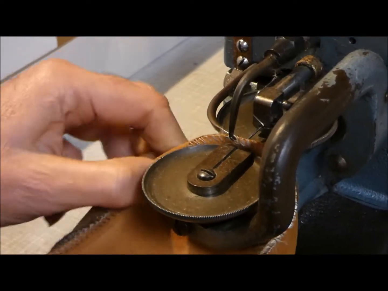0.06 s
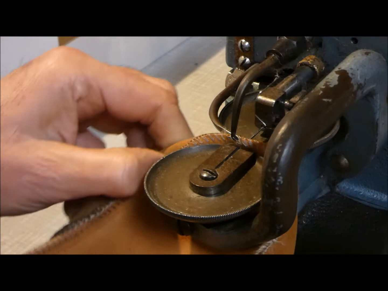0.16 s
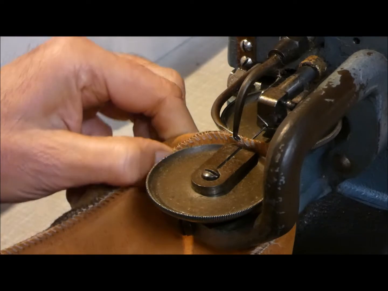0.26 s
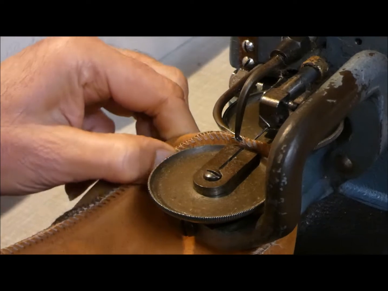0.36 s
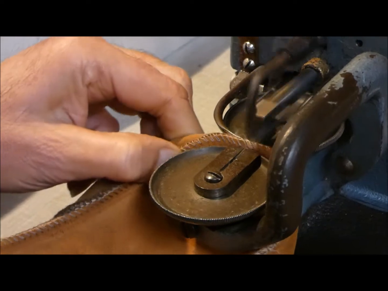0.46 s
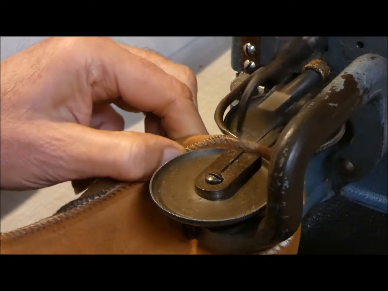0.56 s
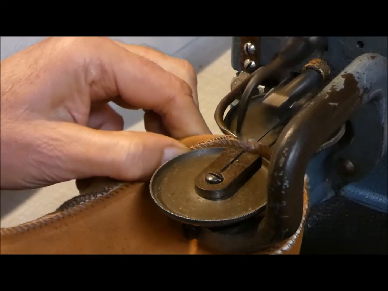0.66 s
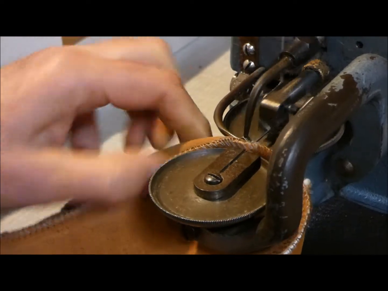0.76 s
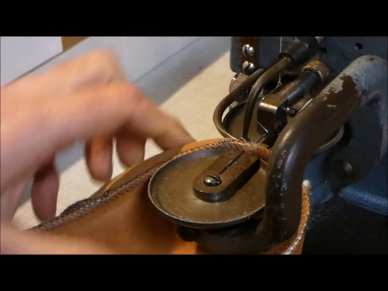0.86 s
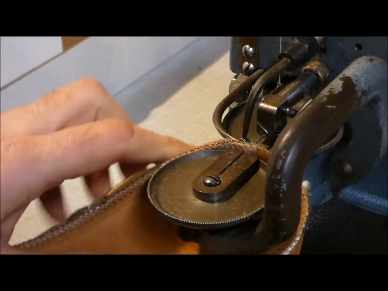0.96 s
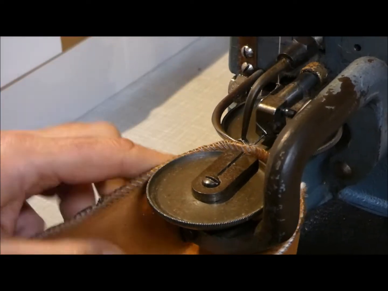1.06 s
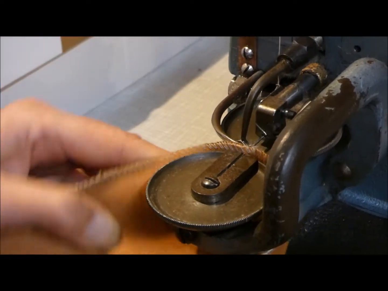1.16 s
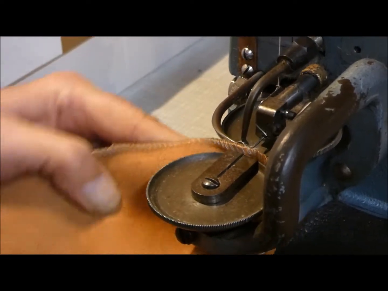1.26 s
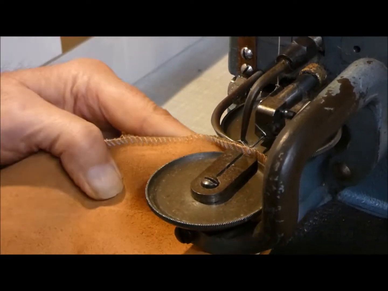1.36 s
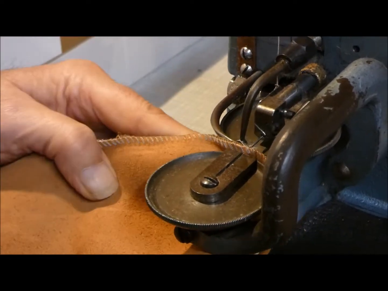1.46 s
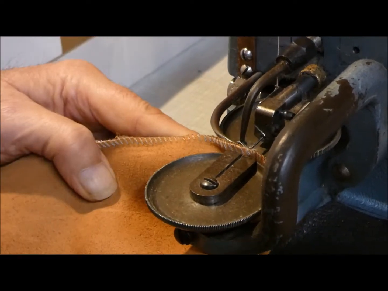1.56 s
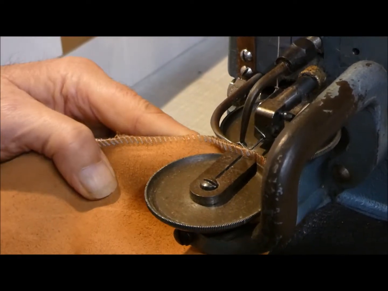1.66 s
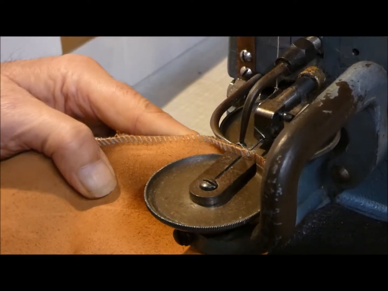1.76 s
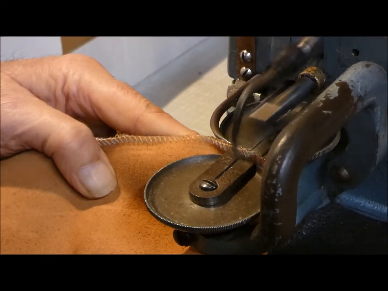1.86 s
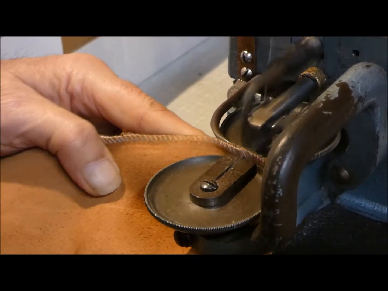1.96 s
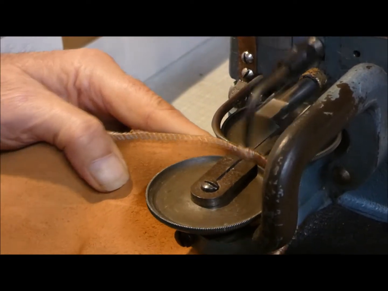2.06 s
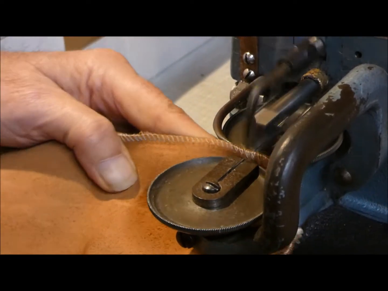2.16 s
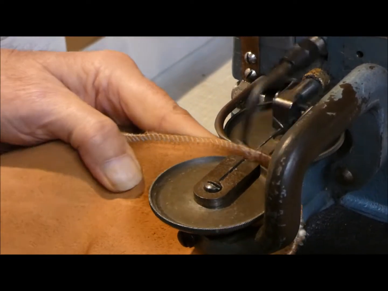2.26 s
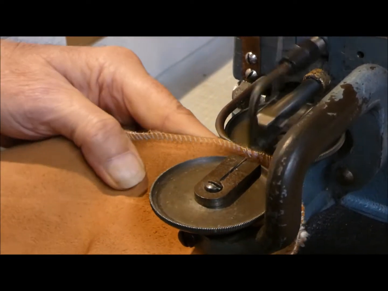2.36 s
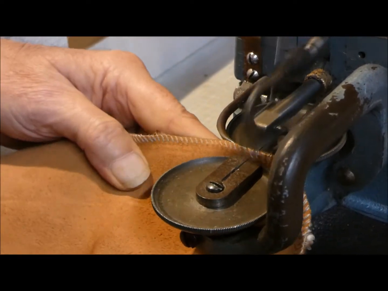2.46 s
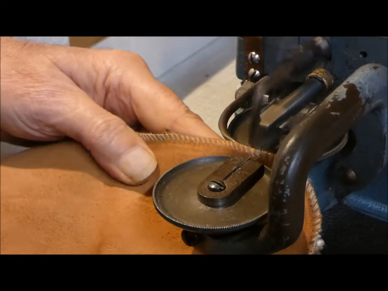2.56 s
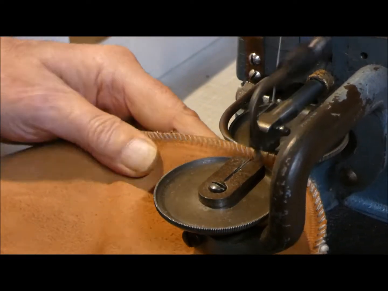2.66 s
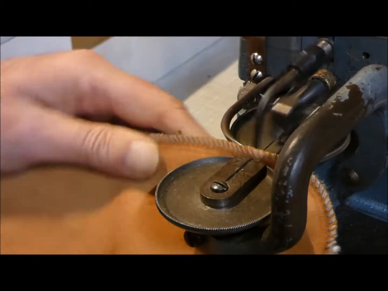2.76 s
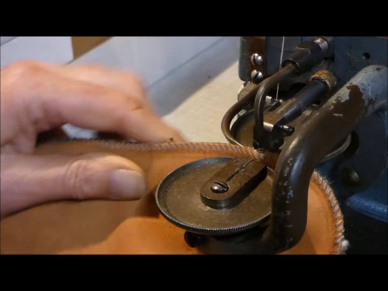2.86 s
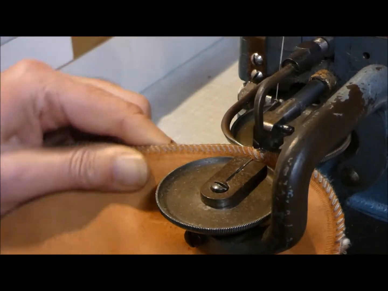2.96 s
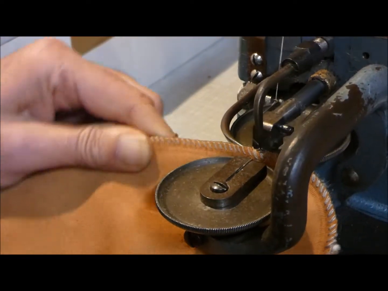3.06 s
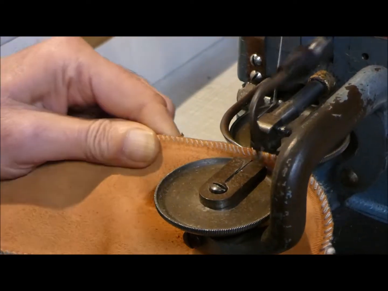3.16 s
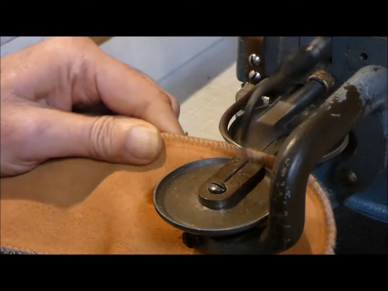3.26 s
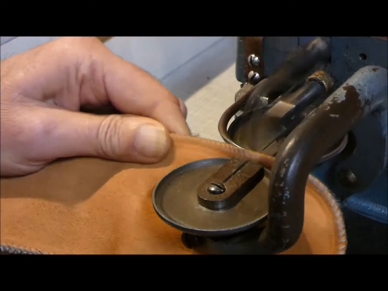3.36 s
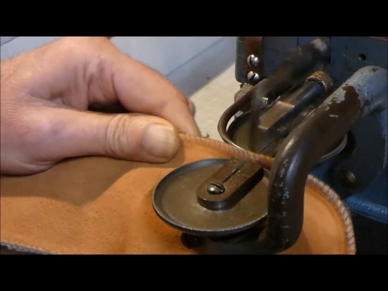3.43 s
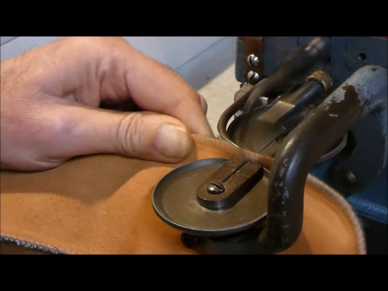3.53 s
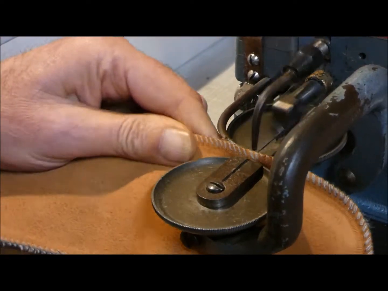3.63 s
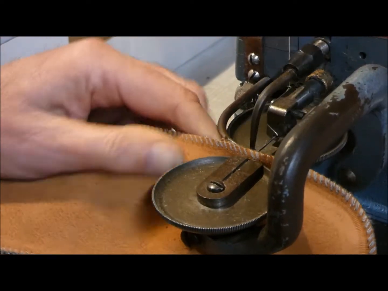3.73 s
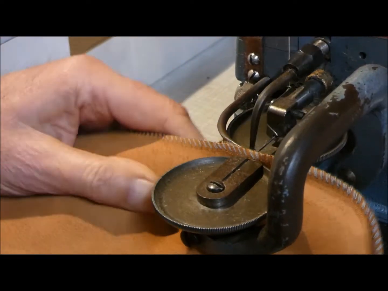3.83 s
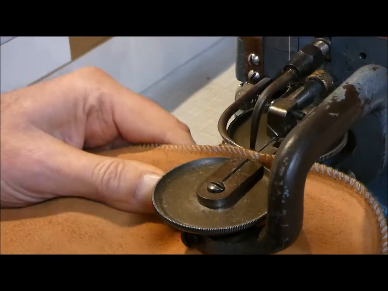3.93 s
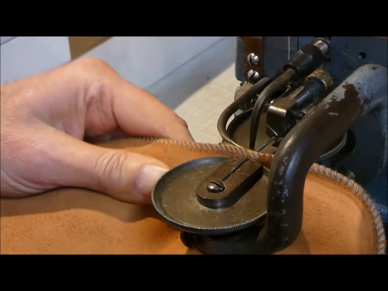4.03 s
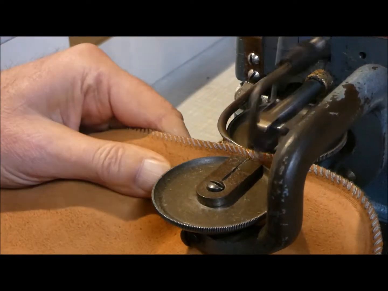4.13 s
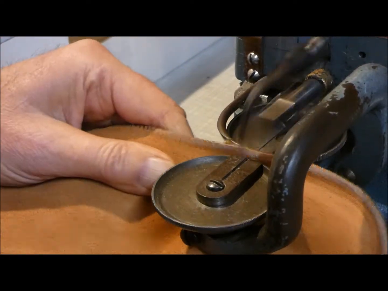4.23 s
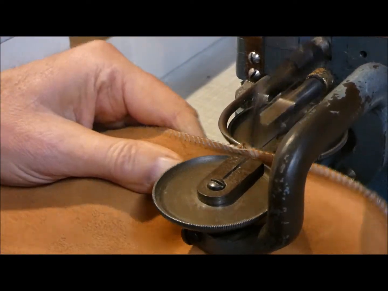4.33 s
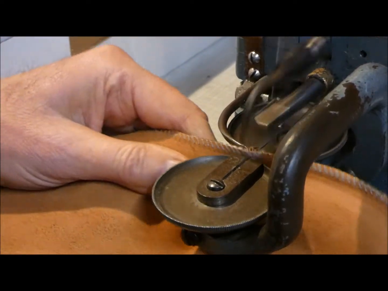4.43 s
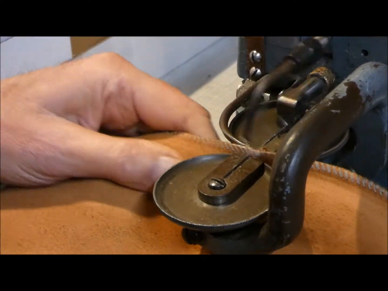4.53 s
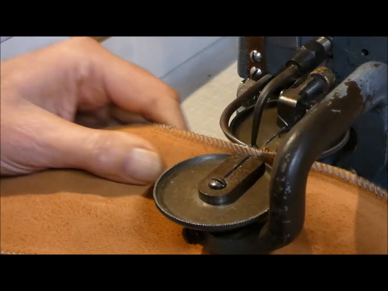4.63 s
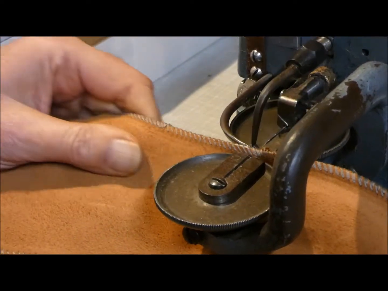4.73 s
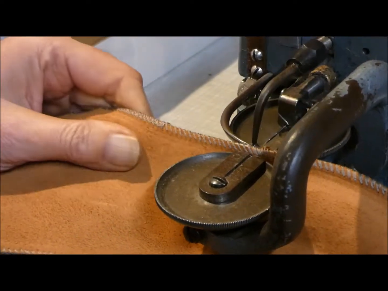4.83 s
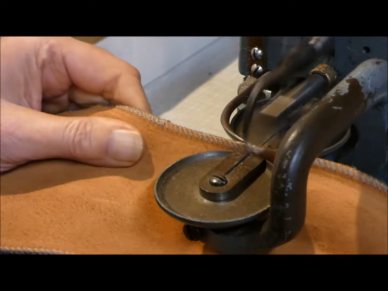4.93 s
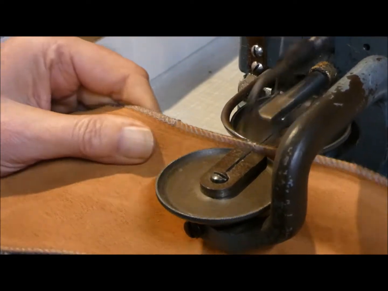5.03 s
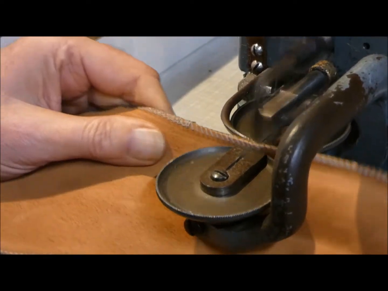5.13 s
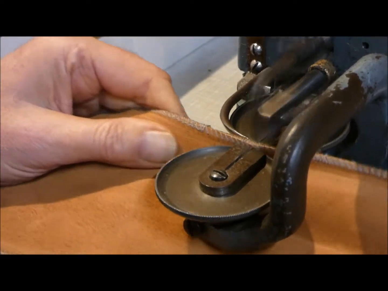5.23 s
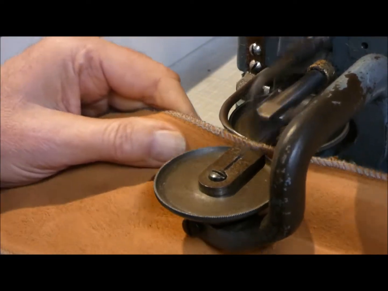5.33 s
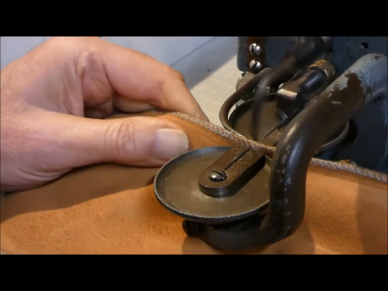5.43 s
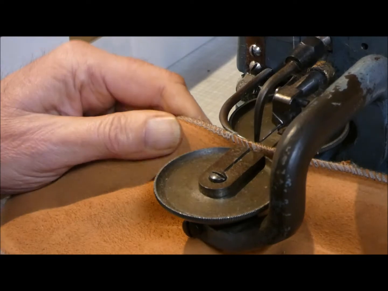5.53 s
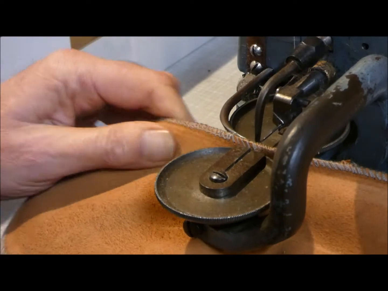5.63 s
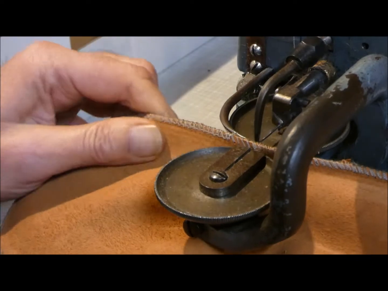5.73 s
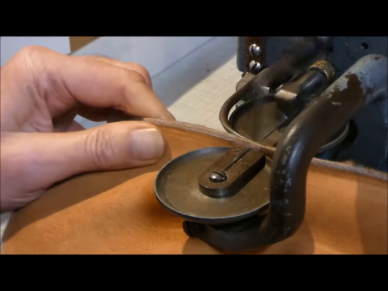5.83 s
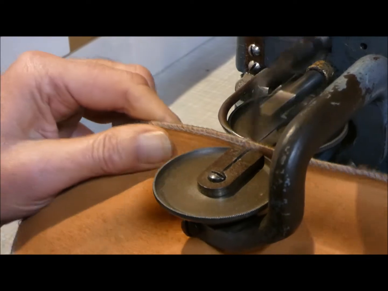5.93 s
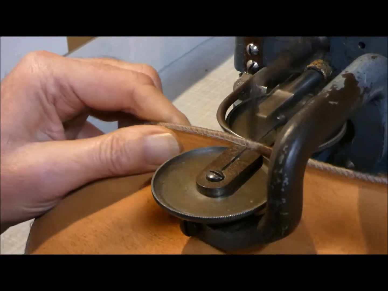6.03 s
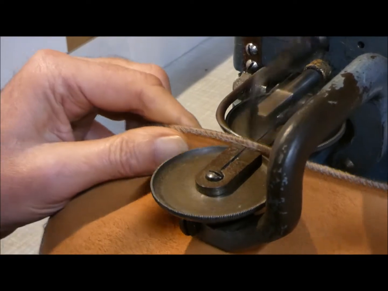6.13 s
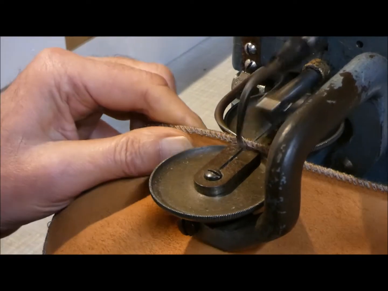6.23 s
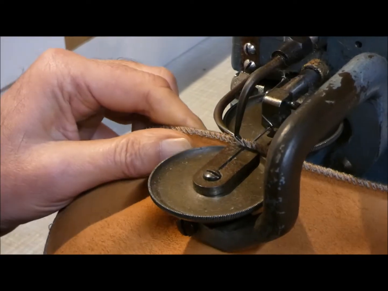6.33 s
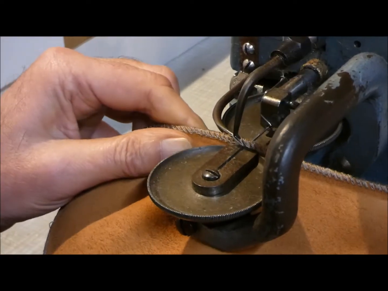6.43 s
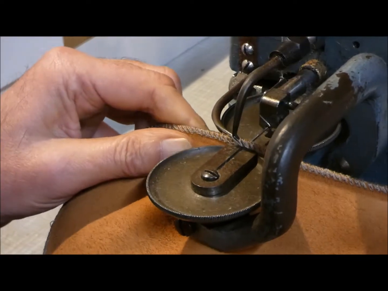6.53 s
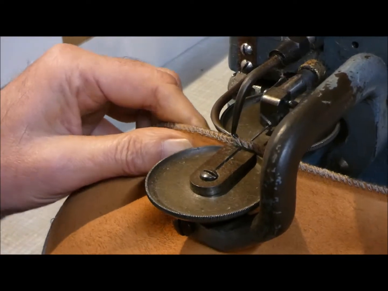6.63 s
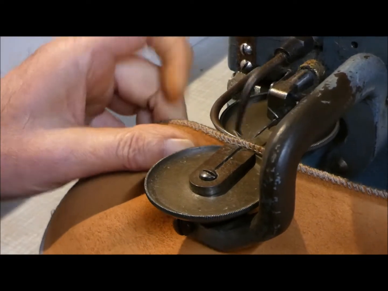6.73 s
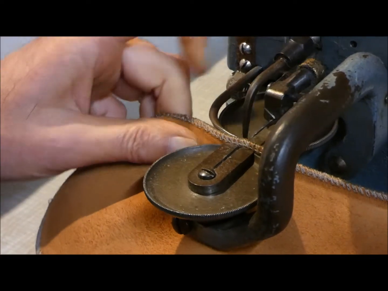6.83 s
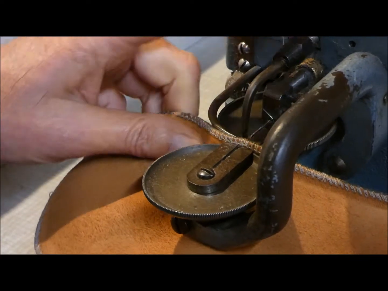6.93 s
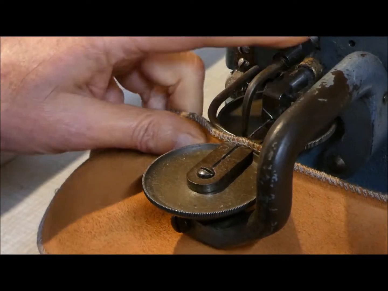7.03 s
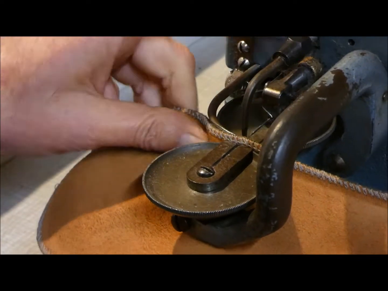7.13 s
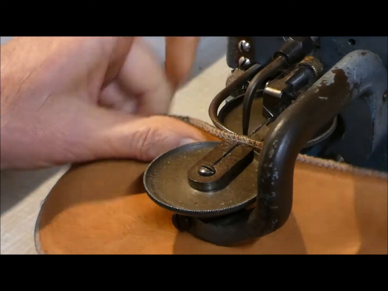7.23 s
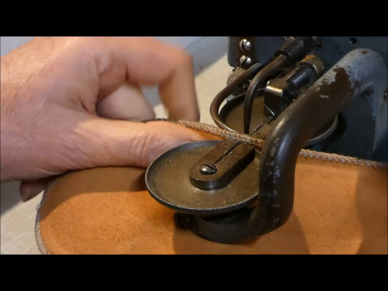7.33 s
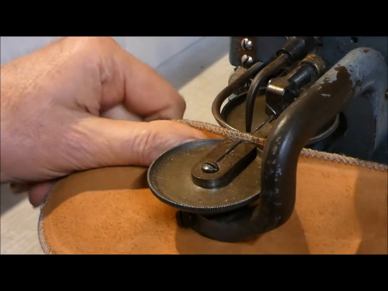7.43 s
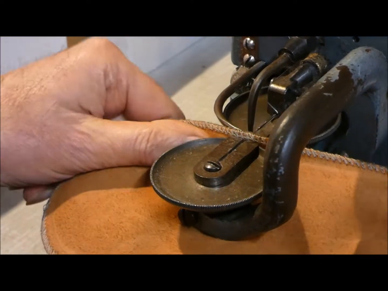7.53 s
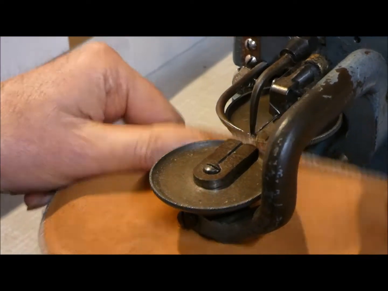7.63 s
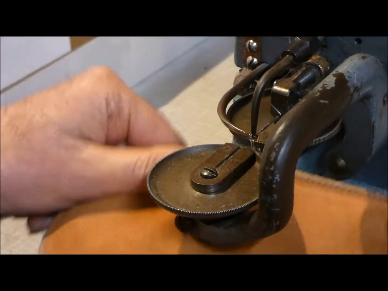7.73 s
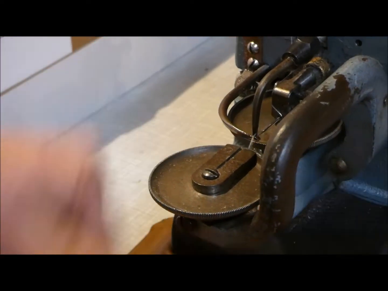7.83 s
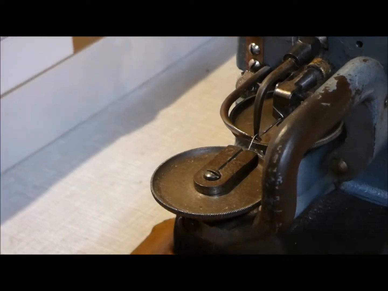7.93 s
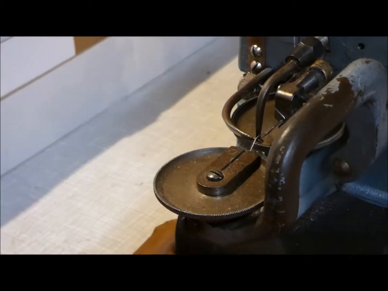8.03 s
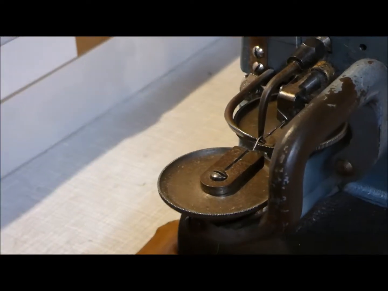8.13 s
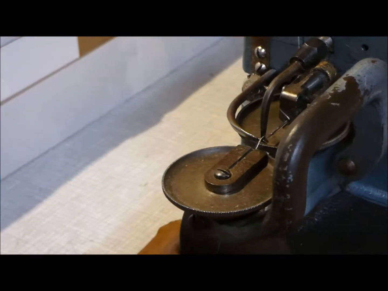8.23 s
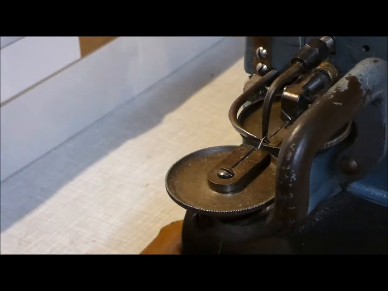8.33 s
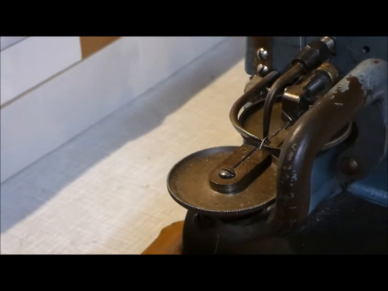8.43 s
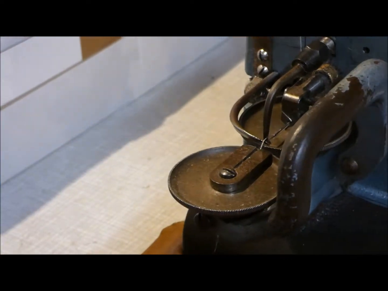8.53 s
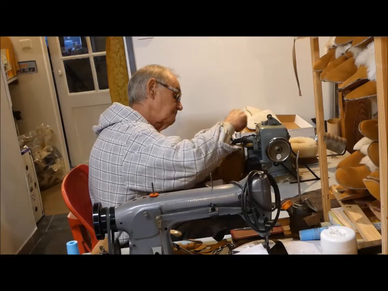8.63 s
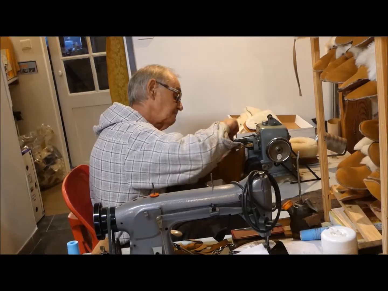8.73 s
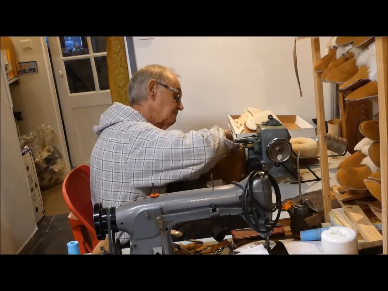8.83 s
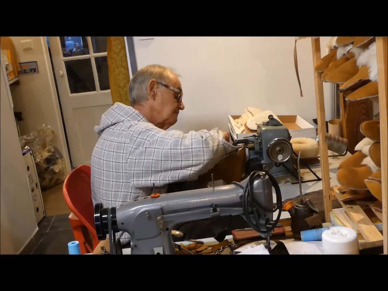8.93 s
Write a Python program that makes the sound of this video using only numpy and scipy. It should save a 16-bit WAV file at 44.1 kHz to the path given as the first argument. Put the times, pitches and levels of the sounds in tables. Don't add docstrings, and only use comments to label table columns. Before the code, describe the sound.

Brief bursts of a motor-driven leather sewing machine hum and rattle, stop abruptly, then two sharp metal knocks, a drag and a chair scrape.

```python
import sys
import numpy as np
from scipy import signal
from scipy.fft import rfft, irfft, next_fast_len
from scipy.io import wavfile
from scipy.ndimage import uniform_filter1d

SR = 44100
rng = np.random.default_rng(int(sys.argv[2]) if len(sys.argv) > 2 else 0)


def inscribe(sig):
    pcm = np.round(np.clip(np.atleast_2d(sig).T, -1, 1) * 32767)
    wavfile.write(sys.argv[1], SR, pcm.astype(np.int16))


def boost(x):
    u = np.asarray(x, float) / 20
    return 10 ** u


N = 396002
TIME = np.arange(N) / SR
SCENE_CHANGE_S = 8.629

# (start [s], held [s], aimed speed [turns/s], braking [turns/s2], angle to first needle pass [turns])
PRESSES = [
    (.4323, .12, 41.0, 60.0, .005),
    (1.8327, .174, 38.33, 56.16, .536),
    (2.3903, .139, 42.85, 56.89, .446),
    (3.1816, .333, 40.21, 154.9, .311),
    (4.1405, .288, 39.03, 134.6, .584),
    (4.9025, .417, 40.88, 155.7, .68),
    (5.7902, .337, 44.8, 179.2, .728),
]
# (time [s], level [dB])
SWITCH_CLICKS = [
    (.012, -37.5),
    (0.4323, -27.5),
    (1.8327, -50),
    (2.3903, -30.5),
    (3.1816, -25.5),
    (3.809, -33),
    (4.1405, -22),
    (4.9025, -26.5),
    (5.7902, -29),
]
# (time [s], level [dB])
THREAD_SNAPS = [
    (3.811, -41),
    (3.825, -39),
]
# (frequency [Hz], width [Hz], level [dB])
TABLE_MODES = [(75, 8.6, -43), (129, 31, -6), (195.4, 27.6, 3.5), (283, 35.5, 5), (371, 58, 3),
               (473, 26, -9)]
# (frequency [Hz], width [Hz], level [dB])
FRAME_MODES = [(384, 88, -3), (565.5, 35.4, 1.5), (637.4, 42.4, 0.5), (757, 123, -4), (940, 40, -2),
               (1106, 84, -2.5), (1331, 61, -10), (1459, 33, -7), (1800, 145, -14), (2210, 480, -19)]
# (frequency [Hz], width [Hz], level [dB])
LINK_MODES = [(2650, 430, -1), (3222, 59, 6), (4304, 55, 4.5), (5320, 52, 4), (6100, 290, -11),
              (7340, 200, -7)]
# (frequency [Hz], width [Hz], level [dB])
NEEDLE_MODES = [(9600, 1300, -17), (13000, 1500, -16), (10300, 500, 5), (11630, 460, 7), (10930, 400, 8),
                (12000, 120, -6)]
# (frequency [Hz], density [dB per Hz])
LOOPER_HISS = [(880, -44), (1500, 1.5), (2780, -4.5), (3210, -10), (3480, -5.5), (4310, -4.5), (5400, -8),
               (8210, -12.5), (11200, -14), (12100, -31), (15500, -47)]
# (multiple of shaft speed [-], level [dB])
IMBALANCE = [(2, -51), (3, -61), (4, -34), (5, -37), (6, -59), (8, -46)]
# (multiple of whine [-], swell [dB])
MODE_CROSSINGS = [(2.0, 8), (1.0, 8.5), (.68, 5.5)]
# (time [s], level [dB], pitch of the answering board [Hz])
CRANK_THUMPS = [(0.481, -10.5, 371), (0.556, -15, 361), (0.699, -32, 372), (1.891, -15, 289),
                (1.973, -8.5, 369), (2.123, -28, 357), (2.263, -35.5, 408), (2.401, -18.5, 386),
                (2.436, -13, 376), (2.52, -9.5, 371), (2.622, -25, 295), (2.662, -29.5, 346),
                (2.703, -35, 275), (3.182, -28, 312), (3.213, -15, 371), (3.247, -11.5, 292),
                (3.321, -16, 306), (3.357, -12, 288), (3.464, -14.5, 363.6), (3.535, -17.5, 282),
                (3.649, -26, 371), (4.16, -16, 367), (4.221, -14, 296.5), (4.262, -12, 375),
                (4.414, -11.5, 367.4), (4.484, -21.5, 409), (4.541, -23, 263), (4.953, -13.5, 285),
                (5.004, -11, 377), (5.043, -9.5, 367.5), (5.117, -19, 362), (5.201, -15.5, 301.5),
                (5.279, -17.5, 359), (5.345, -19.5, 266), (5.802, -27, 393), (5.822, -16.5, 377),
                (5.874, -20, 362), (5.917, -14, 300), (5.958, -13, 351), (6.03, -16, 352),
                (6.12, -17.5, 262), (6.22, -21, 352)]
# (time [s], level [dB])
LINKAGE_JOLTS = [(0.483, -10.5), (0.513, -18), (0.533, -13), (0.687, -17), (0.717, -32), (1.841, -35),
                 (1.862, -35), (1.88, -24), (1.899, -15), (1.946, -12), (1.98, -13), (2.098, -25),
                 (2.415, -17), (2.477, -15), (2.637, -14), (2.726, -18), (3.221, -23), (3.262, -18),
                 (3.524, -9), (4.171, -20), (4.296, -7), (4.364, -8), (4.935, -20), (4.953, -13),
                 (5.029, -15), (5.043, -13), (5.09, -21), (5.815, -19), (5.839, -24), (5.958, -10)]
# (time [s], level [dB], table share [dB], brightness [Hz])
HAND_KNOCKS = [(0.947, -43.5, -1, 1240), (7.328, -30, -4, 1900), (7.335, -33, -3, 1700),
               (7.345, -33, 2, 1400), (7.4002, -16, -2, 5000), (7.405, -17, -2, 4500),
               (7.4093, -17.5, 5.5, 3000), (7.424, -21, 1, 2510), (7.44, -21.5, 3.5, 2500),
               (7.617, -40.5, 4, 4000), (7.644, -35, 2, 2500), (7.6954, -35, -3, 3200),
               (7.7305, -32, 2, 6500), (7.740, -31.5, 3.5, 2500), (7.77, -35, 5.5, 3300),
               (7.78, -35.5, 3, 4500), (7.8693, -13, -14, 8900), (7.8744, -20, -20, 2500),
               (7.882, -24.5, -15, 3000)]
# (frequency [Hz], level [dB], T60 [s])
LEVER_DOWN_MODES = [(550, -3, .06), (820, 3.5, 0.051), (1025, 0, 0.12), (1530, -3.5, 0.052),
                    (1880, -3, 0.072), (2170, 2.5, 0.067), (3000, -24, 0.087), (3780, -6, 0.087),
                    (4371, -2.5, 0.11), (4829, -12, .12), (5066, -11, 0.14)]
# (frequency [Hz], level [dB], T60 [s])
LEVER_UP_MODES = [(800, -0.5, 0.047), (1120, 4, 0.048), (2120, -2, 0.065), (2350, -1.5, 0.037),
                  (2620, -11, .07), (4355, -6, .1), (4800, -6, 0.082), (6072, -4.5, 0.032), (6627, -14, .1),
                  (7600, -8, .12), (9800, -14, 0.093), (10580, -8, .06), (11300, -2, .08),
                  (12020, -18, .07)]
# (frequency [Hz], width [Hz], level [dB])
THUD_MODES = [(136, 40, -11), (190, 40, 1.5), (272, 22, 4.5), (402, 34, -6.5), (600, 190, -18)]
# (start [s], end [s], first level [dB], last level [dB])
DRAG_STROKES = [
    (7.618, 7.728, -35, -35),
    (7.731, 7.795, -28, -34.5),
    (7.795, 7.855, -39, -36.5),
]
# (start [s], end [s], pitch [Hz], level [dB])
PIVOT_SQUEALS = [
    (7.689, 7.725, 5040, -34.5),
    (7.738, 7.772, 4400, -40.5),
    (8.31, 8.342, 1283, -43),
]
# (time [s], pitch [Hz], level [dB])
CHAIR_GLIDE = [
    (8.342, 800, -58),
    (8.36, 880, -53),
    (8.38, 916, -45),
    (8.408, 909, -45.5),
    (8.416, 924, -57),
    (8.5, 920, -75),
]
# (multiple of pitch [-], level [dB])
CHAIR_HARMONICS = [(1, -16), (2, -1), (3, 4.5), (4, -0.5), (5, -10), (6, -13), (7, -28), (8, -32), (9, -29)]
# (start [s], end [s], first level [dB], last level [dB])
CHAIR_SCRAPES = [
    (8.31, 8.345, -57, -59),
    (8.405, 8.425, -44, -43),
    (8.425, 8.5, -38.5, -64),
    (8.508, 8.628, -38, -39.5),
]
# (frequency [Hz], width [Hz], level [dB])
CHAIR_MODES = [(297, 64, 1), (604, 40, 4), (1283, 86, 3.5), (2070, 130, -1.5), (2460, 160, -1.5),
               (3600, 94, -1.5), (5000, 670, -15), (8330, 220, -21), (10500, 2800, -29)]
# (time [s], level [dB])
LENS_TICKS = [(0.1424, -36.5), (0.3018, -36.5), (0.7834, -36), (1.024, -38), (1.0517, -48), (1.2222, -39),
              (1.4223, -40), (1.502, -39), (1.6218, -38), (1.7422, -41.5), (2.341, -39.5), (2.822, -38),
              (2.9014, -40.5), (3.0219, -36.5), (3.822, -38.5), (4.1037, -38), (5.7025, -42),
              (6.6241, -38.5), (6.782, -37), (6.9024, -40.5), (7.223, -37), (8.127, -47), (8.3117, -55),
              (8.7311, -38), (8.7909, -71), (8.86, -45), (8.8897, -38), (8.9644, -42.5)]
# (frequency [Hz], width [Hz], level [dB])
LENS_STEP_MODES = [(436, 54, -14), (650, 46, 1), (1382, 210, 1.5), (1950, 380, 0.6), (3250, 230, -3.5)]
# (frequency [Hz], width [Hz], level [dB])
HOUSING_MODES = [(405, 36, 6), (469, 31, 3.5), (608, 44, 6.5), (818, 131, 0), (1438, 292, 0.5),
                 (1515, 34, -2), (2108, 29, -3), (2470, 140, -10.5), (3320, 84, -56)]
# (time [s], level [dB])
FINGER_BRUSHES = [
    (3.7883, -49),
    (3.821, -49),
    (6.5444, -78),
    (6.7406, -43),
    (7.1167, -40),
    (7.2988, -43.5),
    (7.8394, -39.5),
    (8.8695, -44.5),
]
# (middle [s], length [s], bench level [dB], leather level [dB])
WORK_SHIFTS = [
    (1.2, 0.39, -64, -62.5),
    (2.926, 0.27, -60, -63),
    (5.715, 0.21, -75, -86),
    (7.252, 0.29, -55, -65.5),
    (7.505, 0.25, -37.5, -58),
    (7.955, 0.29, -46, -83),
    (8.208, 0.45, -56, -64),
    (8.895, 0.16, -80, -72),
]
# (frequency [Hz], density [dB per Hz])
LEATHER_SPECTRUM = [(1470, -18), (2500, 7.5), (3500, 1), (6060, 1.5), (7680, -11.5), (9880, -7.5),
                    (15500, -34)]
# (frequency [Hz], density [dB per Hz])
WORKSHOP_SPECTRUM = [(18, -62), (30, -38), (146, -23), (230, -10), (262, -18.5), (302, -13), (329, -17.5),
                     (400, -10.5), (520, -25.5), (880, -120)]
# (frequency [Hz], width [Hz], level [dB])
SWAY_MODES = [(72.5, 13, -10.5), (273.5, 20, 0)]
# (frequency [Hz], left-right likeness [0-1])
STEREO_LIKENESS = [(60, 0.19), (180, 0.63), (550, 0.91), (1650, 0.65), (4970, 0.74), (15000, 0.48)]

WHINE_PER_STITCH, FULL_SPEED_HZ, MAINS_HUM_HZ = 19.5, 31.6, 201.3
SPIN_UP_S, BRAKE_GRIP_S = .2363, .01726
CURRENT_RISE_S, CURRENT_BEND, BACK_VOLTAGE, FIRST_JOLT = 0.035, 3.27, 0.93, .2
# (level at full speed [dB], power of speed, level at full current [dB], loss after cut [dB/s])
HUM_LAW, RUMBLE_LAW = (-35, 4, -20, 80), (-26, 1.6, -21.5, 200)
TOP_LAW = (-36.5, 0.5, -32, 200)
CLATTER_LAW, HISS_LAW = (-25, 1.31, -21.5, 150), (-26, 1.5, -37, 150)
RING_DOWN_S = 0.015
HUM_DROP_SPEED, HUM_DROP_WIDTH, HUM_DROP_DB = 25, 1.5, -6.5
CROSSING_WIDTH = 0.17
SQUEAK_DB, SQUEAK_SPREAD_DB = -27.5, 1.8
THUMP_RISE_S, THUMP_T60_S, THUMP_DB = .012, .15, -2.8
JOLT_DB, JOLT_T60_S = -9.5, 0.036
GRIT_DB = 23.5
FOCUS_PER_S, FOCUS_AT_S, FOCUS_SLIP_S, FOCUS_DEPTH_DB = 25, .027, .011, 2.2
SING_DB = -57.5
SHOP_DB, SHOP_AFTER_CHANGE_DB, MURMUR_DB, LEATHER_DB = -63.5, -78, -49.5, -72
# (level at release from full speed [dB], loss [dB/s])
BENCH_SETTLES, WORK_SETTLES = (-32, 51), (-50, 47)
EARLIER_RELEASE_S = -0.32
SWAY_DB, MIC_HISS_DB = -3, -65
ROOM_T60_S, WALL_CUT_HZ = 0.23, 18000


def rms_one(x):
    return x / np.sqrt(np.mean(x ** 2) + 1e-20)


def low_pass(x, hz, order):
    return signal.sosfilt(signal.butter(order, hz, fs=SR, output="sos"), x)


def at_hz(points, hz):
    return np.interp(np.log(hz), np.log(np.array(points)[:, 0]), np.array(points)[:, 1])


def gains(tables):
    rows = np.concatenate(tables)
    inside = sum((TIME >= t[0][0]) & (TIME <= t[-1][0]) for t in tables) > 0
    gate = uniform_filter1d(inside * 1.0, size=90)
    return [gate * boost(np.interp(TIME, rows[:, 0], column)) for column in rows.T[1:]]


def strokes(rows):
    return gains([[(start, first_db), (end, last_db)] for start, end, first_db, last_db in rows])[0]


def drift(rate):
    r = np.exp(-80 * np.pi * rate / SR)
    slow = signal.lfilter([1], [1, -2 * r, r * r], rng.standard_normal(N // 40 + 2002))[2000:]
    return np.interp(np.arange(N) / 40, np.arange(len(slow)), rms_one(slow))


def strikes(events):
    clicks = np.zeros(N)
    clicks[[round(e[0] * SR) for e in events]] = boost(np.array([e[1] for e in events]))
    return clicks


def puffs(events, t60, rise_s=0.000067):
    r, soft = boost(-60 / (t60 * SR)), np.exp(-1 / (rise_s * SR))
    decay = signal.lfilter([1], [1, -r], strikes(events) + 1e-18)
    return signal.lfilter([1 - soft], [1, -soft], decay)


def grains(per_s, spread_db):
    sizes = boost(spread_db * np.minimum(rng.exponential(1, N), 4)) * rng.choice([-1, 1], N)
    return sizes * (rng.random(N) < per_s / SR)


def white():
    return rng.standard_normal((2, 2, N))


def resonate(x, modes):
    out = 0
    for k, (hz, width, db) in enumerate(modes):
        r = np.exp(-np.pi * width / SR)
        poles = [1, -2 * r * np.cos(2 * np.pi * hz / SR), r * r]
        ring = signal.lfilter([(1 - r * r) / 2, 0, (r * r - 1) / 2], poles, x + 1e-18)
        out = out + (-1) ** k * boost(db) * ring
    return out


def banded(spectrum, patchy_db, source):
    out, edges = 0, spectrum[0][0] * 2 ** np.arange(0, 9, .5)
    edges = np.append(edges[edges < spectrum[-1][0]], spectrum[-1][0])
    for k, (low, high) in enumerate(zip(edges, edges[1:])):
        band = signal.butter(2, [low, high], "band", fs=SR, output="sos")
        mid, side = signal.sosfilt(band, source[k % 2])
        hz = np.sqrt(low * high)
        alike = np.clip(at_hz(STEREO_LIKENESS, hz), 0, 1)
        gain = boost(at_hz(spectrum, hz) + patchy_db * drift(15.3))
        out = out + gain * (np.sqrt(1 + alike) * mid + np.sqrt(1 - alike) * side * [[1], [-1]])
    return rms_one(out)


def shaft():
    press = np.maximum(np.searchsorted(np.array(PRESSES)[:, 0], TIME) - 1, 0)
    start, held, aim, braking, first = np.array(PRESSES)[press].T
    driven, coast = np.clip(TIME - start, 0, held), np.maximum(TIME - start - held, 0)
    reached = 1 - np.exp(-driven / SPIN_UP_S)
    braked_s = coast - BRAKE_GRIP_S * (1 - np.exp(-coast / BRAKE_GRIP_S))
    speed = np.maximum(aim * reached - braking * braked_s, 0)
    turns = np.cumsum(speed) / SR
    angle = turns - np.interp(start, TIME, turns) - first
    swell = FIRST_JOLT * (driven > 0) + (1 - np.exp(-driven / CURRENT_RISE_S)) ** CURRENT_BEND
    current = swell * np.maximum(1 - BACK_VOLTAGE * reached, 0)
    return speed, angle, current, coast


def effort(law, speed, current, coast):
    full_db, power, current_db, loss_db = law
    r = np.exp(-1 / (RING_DOWN_S * SR))
    moving = signal.lfilter([1 - r], [1, -r], (speed / FULL_SPEED_HZ) ** power + 1e-18)
    return np.hypot(boost(full_db) * moving, boost(current_db - loss_db * coast) * current)


def motor(speed, angle, current, coast):
    hum, top, rumble = (effort(law, speed, current, coast) for law in (HUM_LAW, TOP_LAW, RUMBLE_LAW))
    top_hz = TABLE_MODES[4][0]
    off_mode = np.log(WHINE_PER_STITCH * speed / top_hz + 1e-9) / CROSSING_WIDTH
    swell_db = sum(db * np.exp(-(off_mode + np.log(k) / CROSSING_WIDTH) ** 2) for k, db in MODE_CROSSINGS)
    top = top * boost(swell_db - 88.0 * coast)
    hum = hum * boost(HUM_DROP_DB / (1 + np.exp((HUM_DROP_SPEED - speed) / HUM_DROP_WIDTH)))
    turns = np.cumsum(speed * (1 + 0.039 * np.cos(2 * np.pi * angle))) / SR
    buzz_orders = [(.5, -15.0), (1, 3), (1.5, -10.5)]
    buzz = sum(boost(db) * np.sin(2 * np.pi * k * MAINS_HUM_HZ * TIME) for k, db in buzz_orders)
    whine = np.sin(2 * np.pi * WHINE_PER_STITCH * turns) * boost(4.4 * drift(21))
    shake = sum(boost(db) * np.sin(2 * np.pi * k * turns) for k, db in IMBALANCE)
    shake = shake * (speed / FULL_SPEED_HZ) ** 3.1
    table = rumble * boost(-2) * rms_one(resonate(grains(700, spread_db=1.0), TABLE_MODES[:4]))
    top_tone = np.sin(2 * np.pi * np.cumsum(top_hz + 6.1 * drift(20.4)) / SR)
    table += top * boost(0.5 + 3.4 * drift(22.0)) * top_tone
    table += resonate(boost(-3.0) * hum * whine, TABLE_MODES[3:4] + FRAME_MODES[:3])
    return hum * buzz + shake + table


def linkage(speed, angle, current, coast):
    clatter, hiss = (effort(law, speed, current, coast) for law in (CLATTER_LAW, HISS_LAW))
    pulse_db = 0.5 + 1.35 * drift(19.5) + 0.58 * np.cos(4 * np.pi * (angle - .2))
    frame = clatter * boost(pulse_db) * rms_one(resonate(grains(1500, spread_db=3.0), FRAME_MODES))
    stroke = boost(2.0 * np.cos(2 * np.pi * (angle - .12)))
    rub = 0.78 * white() + 0.14 * grains(1400, spread_db=7.5)
    links = hiss * stroke * boost(-8.0) * rms_one(resonate(grains(900, spread_db=2.5), LINK_MODES))
    return frame + links, hiss * stroke * banded(LOOPER_HISS, patchy_db=1.0, source=rub)


def thumps():
    out, age = np.zeros(N), TIME[:SR // 5]
    shape = (1 - np.exp(-age / THUMP_RISE_S)) * boost(-60 * age / THUMP_T60_S)
    for s, db, hz in CRANK_THUMPS:
        at = round(s * SR)
        out[at:at + len(age)] += boost(db + THUMP_DB) * shape / shape.max() * np.sin(2 * np.pi * hz * age)
    rattle = puffs(LINKAGE_JOLTS, t60=JOLT_T60_S, rise_s=.0012) * boost(JOLT_DB)
    noise = rng.standard_normal(N)
    frame, links = rms_one(resonate(noise, FRAME_MODES[1:])), rms_one(resonate(noise, LINK_MODES))
    return out + rattle * (frame + boost(-14.0) * links)


def needle(speed, angle):
    passes = np.flatnonzero(np.diff(np.floor(angle)) == 1)
    passes = passes[speed[passes] > 1]
    bite_db = SQUEAK_DB + 20 * np.log10(speed[passes] / FULL_SPEED_HZ) + SQUEAK_SPREAD_DB * drift(31)[passes]
    bites = puffs(list(zip(TIME[passes], bite_db)), t60=0.062, rise_s=0.00021)
    squeak = bites * boost(-6.5 + 2.0 * drift(170)) * rms_one(resonate(rng.standard_normal((2, N)), NEEDLE_MODES))
    return 0.92 * squeak[0] + 0.45 * squeak[1] * [[1], [-1]]


def machine():
    speed, angle, current, coast = shaft()
    clatter, hiss = linkage(speed, angle, current, coast)
    near = motor(speed, angle, current, coast) + clatter + thumps()
    return near, needle(speed, angle) + hiss


def switch():
    burst = puffs(SWITCH_CLICKS, t60=0.062) * boost(-6.5 + 2.5 * drift(200)) * rng.standard_normal(N)
    click = signal.sosfilt(signal.butter(3, [1000, 8500], "band", fs=SR, output="sos"), burst)
    snap = puffs(THREAD_SNAPS, t60=.008) * rng.standard_normal(N)
    return click + np.gradient(snap) + boost(13) * resonate(burst, FRAME_MODES)


def knocks():
    out, noise = np.zeros(N), rng.standard_normal((len(HAND_KNOCKS), SR // 2))
    age = TIME[:SR // 2]
    hit = age == 0
    for (s, db, share_db, bright_hz), rattle in zip(HAND_KNOCKS, noise):
        modes = LEVER_UP_MODES if s > 7.8 else LEVER_DOWN_MODES
        blow = low_pass(9.5 * hit + 0.75 * rattle * boost(-60 * age / 0.014), bright_hz, order=4)
        steel = boost(16.5) * resonate(blow, [(hz, 3.5 / t60, mode_db) for hz, mode_db, t60 in modes])
        tail = low_pass(rattle * boost(-60 * age / 0.22), bright_hz, order=1)
        crack = blow + boost(-6.5) * low_pass(tail, 9700, order=4)
        crack = boost(-3.0) * signal.lfilter([1, -1], [1, -.92], crack)
        shove = low_pass(24.7 * hit + 0.64 * rattle * boost(-60 * age / 0.08), 1500, order=2)
        push = boost(share_db + 21) * resonate(shove, THUD_MODES)
        at = round(s * SR)
        out[at:at + len(age)] += boost(db) * (steel + crack + push)
    return out


def drag():
    pull = strokes(DRAG_STROKES)
    rumble = rms_one(resonate(grains(424, spread_db=0.5), TABLE_MODES[2:] + FRAME_MODES[:3]))
    grit = low_pass(grains(6500, spread_db=4.5), 6500, order=3)
    grit_modes = FRAME_MODES[5:] + [(1156, 85, -5.0), (2840, 300, -13), (4400, 2400, -26.0), (6950, 1800, -31)]
    out = pull * boost(-2.5) * rumble
    out += boost(GRIT_DB) * pull ** 2 * boost(1.5) * rms_one(resonate(grit, grit_modes))
    for start, end, hz, db in PIVOT_SQUEALS:
        swell = np.sin(np.pi * np.clip((TIME - start) / (end - start), 0, 1)) ** 0.7
        squeal = np.sin(2 * np.pi * np.cumsum(hz + 70 * drift(119.7)) / SR)
        out += boost(db + 2.5 * drift(80)) * swell * squeal
    return out


def chair():
    s, hz, db = np.transpose(CHAIR_GLIDE)
    turns = np.cumsum(np.interp(TIME, s, hz) * (1 + 0.0039 * drift(100))) / SR
    tone = sum(boost(order_db + 3.0 * drift(90)) * np.sin(2 * np.pi * k * turns) for k, order_db in CHAIR_HARMONICS)
    squeak = gains([np.transpose([s, db])])[0] * rms_one(tone) * boost(4.5)
    scrape = low_pass(rms_one(resonate(grains(4000, spread_db=1.5), CHAIR_MODES)), 7800, order=2)
    return squeak + strokes(CHAIR_SCRAPES) * boost(-1.0) * scrape


def lens():
    teeth = np.zeros(67)
    teeth[::33] = .3, .7, 1.0
    steps = signal.lfilter(teeth, [1], strikes(LENS_TICKS))
    ticks = sum(resonate(resonate(steps * boost(1.7 * drift(2.8)), [mode]), [mode]) for mode in LENS_STEP_MODES)
    changed = TIME > SCENE_CHANGE_S
    beat = np.cos(2 * np.pi * FOCUS_PER_S * (TIME - FOCUS_AT_S + FOCUS_SLIP_S * changed))
    murmur = boost(MURMUR_DB) * boost(FOCUS_DEPTH_DB * beat)
    loose = puffs(LENS_TICKS, t60=0.037, rise_s=0.0018) * boost(3.0)
    loose = loose + murmur * boost(-0.26 + 3.1 * np.minimum(drift(25.5), 1.2))
    restless = loose * rms_one(resonate(rng.standard_normal((2, N)), HOUSING_MODES))
    note = rms_one(resonate(rng.standard_normal(N), [(1430, 48, 0)]))
    sing = changed * boost(SING_DB + 3.0 * drift(20.5) + FOCUS_DEPTH_DB * beat) * note
    wide = 0.77 * restless[0] + 0.57 * restless[1] * [[1], [-1]]
    return low_pass(boost(36.5) * ticks + sing + wide, 3500, order=3)


def quiet():
    before = TIME < SCENE_CHANGE_S
    releases = [(EARLIER_RELEASE_S, FULL_SPEED_HZ)]
    releases += [(s + held, aim * (1 - np.exp(-held / SPIN_UP_S))) for s, held, aim, *_ in PRESSES]
    out = [boost(LEATHER_DB), np.where(before, boost(SHOP_DB), boost(SHOP_AFTER_CHANGE_DB))]
    for k, (db, loss_db) in enumerate([WORK_SETTLES, BENCH_SETTLES]):
        settle = sum((TIME > s) * boost(db - loss_db * abs(TIME - s)) * speed / FULL_SPEED_HZ for s, speed in releases)
        hands = 0
        for middle, length, *levels in WORK_SHIFTS:
            hands = hands + boost(levels[1 - k]) * np.cos(np.pi * np.clip((TIME - middle) / length, -.5, .5))
        out[k] = out[k] + settle * before + hands
    return *out, settle


def leather(rustle):
    brushes = boost(-6.0) * puffs(FINGER_BRUSHES, t60=0.17, rise_s=0.0019)
    return (rustle + brushes) * banded(LEATHER_SPECTRUM, patchy_db=2.5, source=white())


def workshop(hum, settle):
    air = hum * banded(WORKSHOP_SPECTRUM, patchy_db=5.5, source=white())
    return air + boost(SWAY_DB) * settle * rms_one(resonate(rng.standard_normal(N), SWAY_MODES))


def room(x):
    size = next_fast_len(N + SR // 2)
    turn = np.exp(-2j * np.pi * np.arange(size // 2 + 1) / size)
    dull = np.exp(-2 * np.pi * WALL_CUT_HZ / SR)
    walls = np.zeros((2, len(turn)), complex)
    for k, lag in enumerate((rng.uniform(.006, .03, 12) * SR).astype(int)):
        loop = boost(-60 * lag / SR / ROOM_T60_S) * (1 - dull) / (1 - dull * turn) * turn ** lag
        walls[k % 2] += (-1) ** (k // 2) * loop / (1 - loop)
    return irfft(walls * rfft(x, size), size)[:, :N]


def scene():
    near, wide = machine()
    near = near + switch() + knocks() + drag() + chair()
    echo = boost(-15.0) * room(near - 0.79 * low_pass(near, 430, order=1))
    front = (near * boost(np.array([[-.1], [.1]])) + echo + wide) * (TIME < SCENE_CHANGE_S)
    rustle, hum, settle = quiet()
    return front + lens() * boost(np.array([[-1.5], [1.5]])) + leather(rustle) + workshop(hum, settle)


def band_limit(x):
    return signal.sosfilt(signal.butter(12, 16490, fs=SR, output="sos"), x)


def record(dry):
    mix = dry + boost(MIC_HISS_DB) * low_pass(rng.standard_normal(dry.shape), 6000, order=1)
    mix = signal.sosfilt(signal.butter(2, 55, "high", fs=SR, output="sos"), mix)
    mix = signal.sosfilt(signal.cheby2(10, 50, 16100, fs=SR, output="sos"), mix)
    return band_limit(mix)


dry = scene()
out = record(dry)
inscribe(out)
```